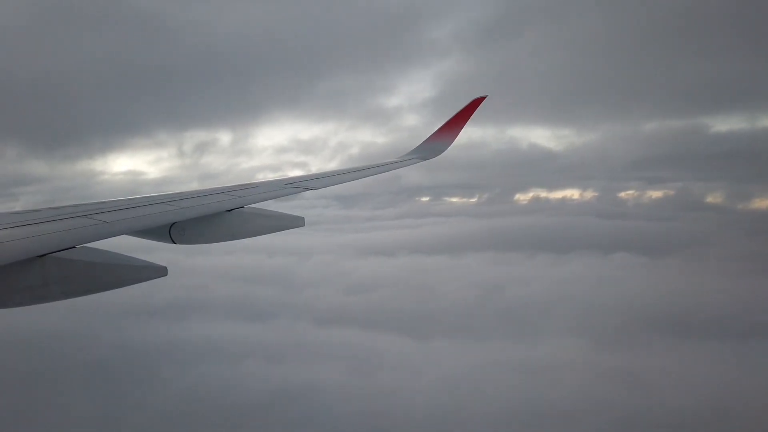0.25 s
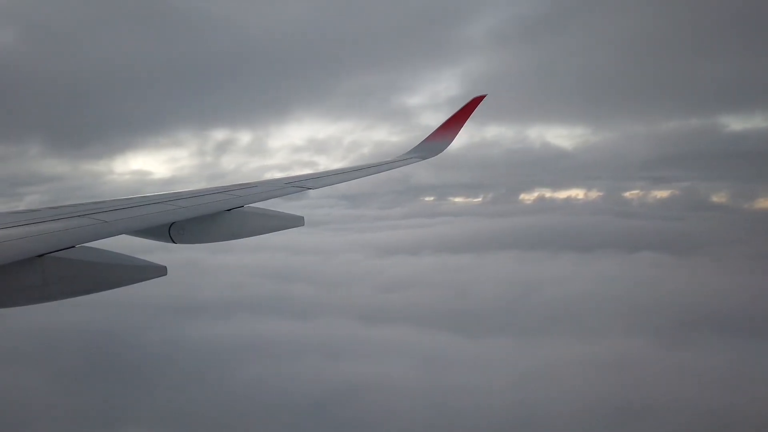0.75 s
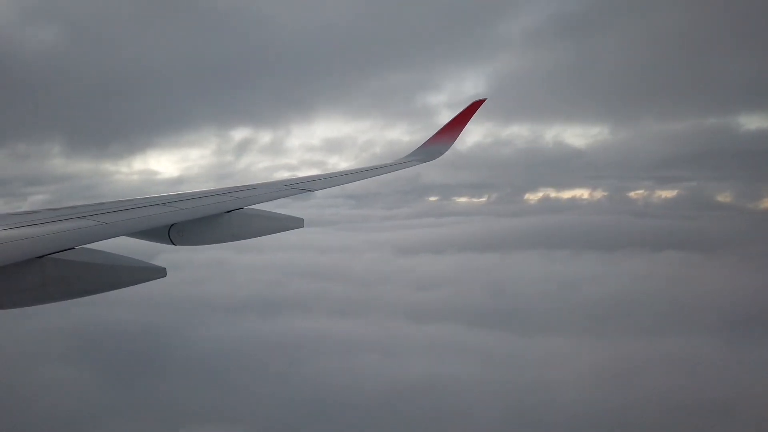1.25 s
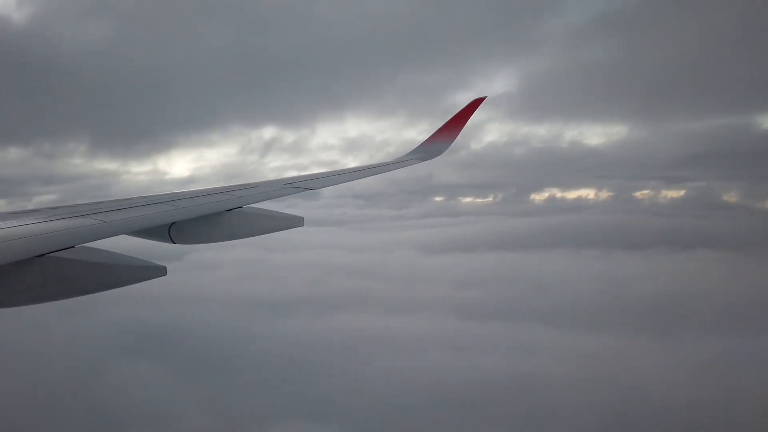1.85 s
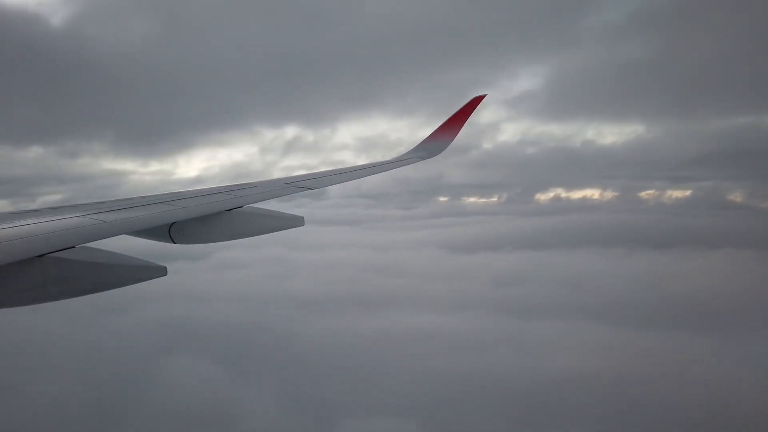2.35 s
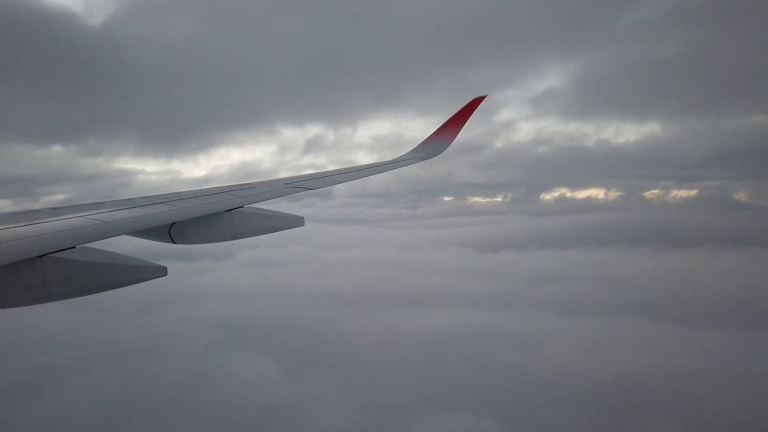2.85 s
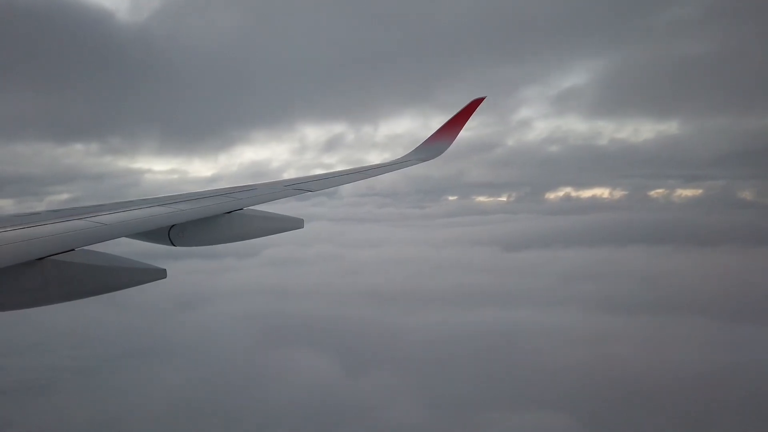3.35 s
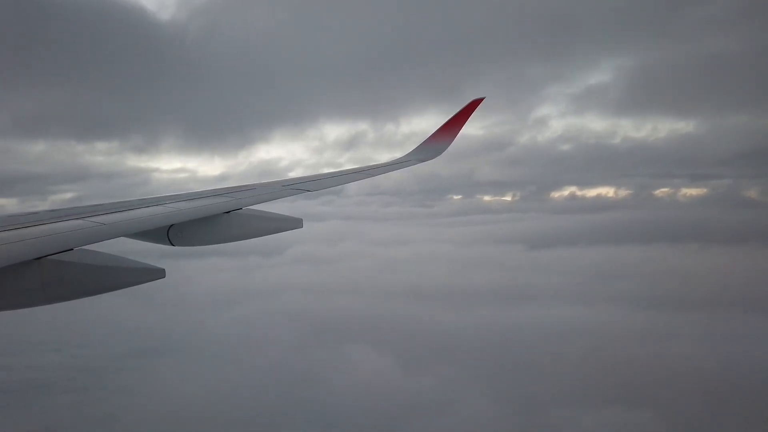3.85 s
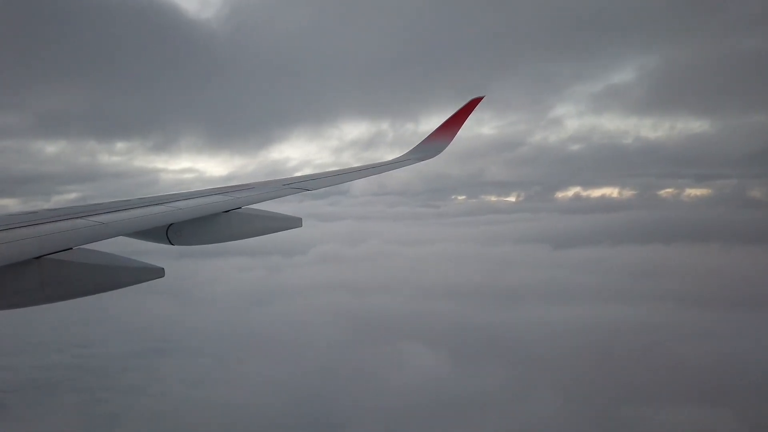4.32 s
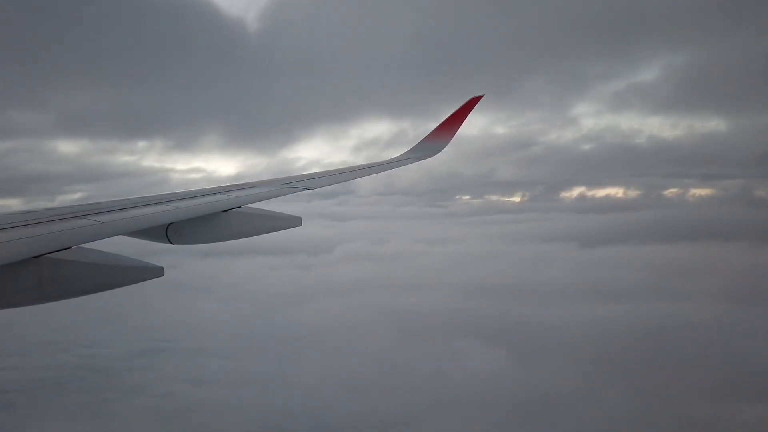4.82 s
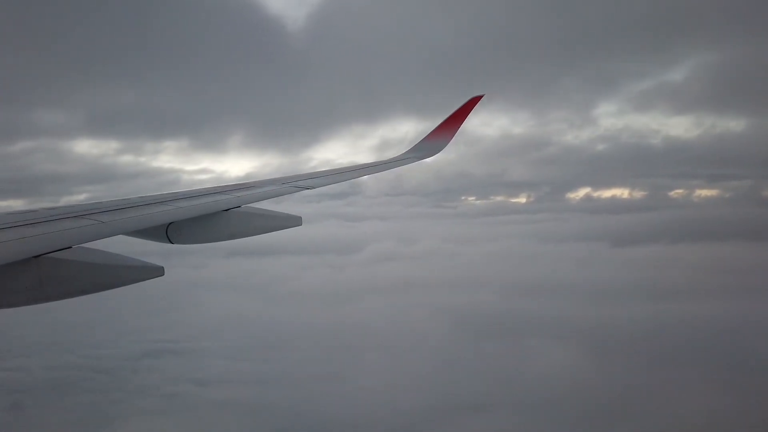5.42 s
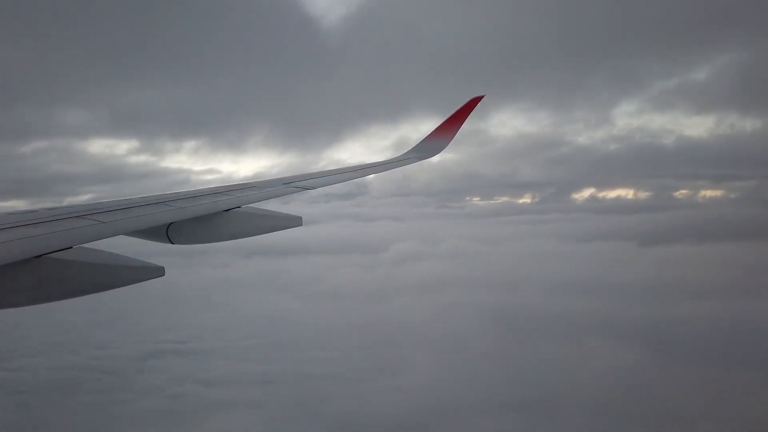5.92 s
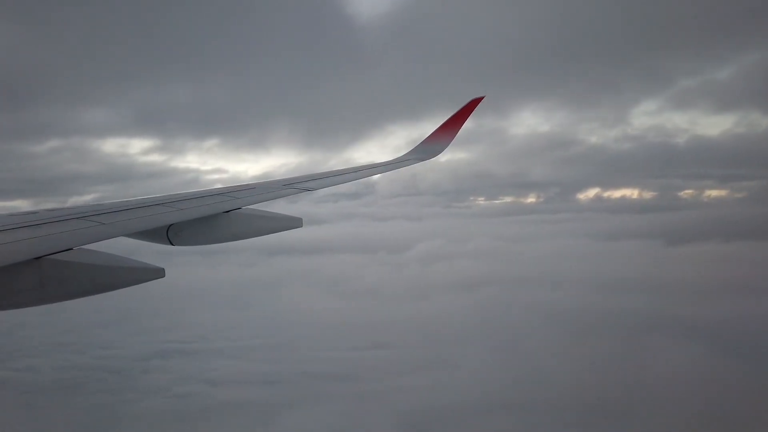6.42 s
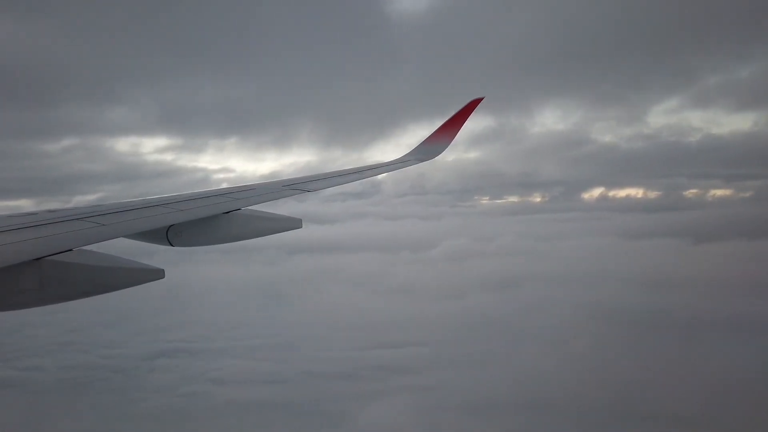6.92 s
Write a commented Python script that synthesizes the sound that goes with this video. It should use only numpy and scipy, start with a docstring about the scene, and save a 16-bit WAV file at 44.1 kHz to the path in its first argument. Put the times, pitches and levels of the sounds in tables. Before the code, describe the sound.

Deep, steady airliner cabin rumble with uneven low booming surges and muffled rushing air, plus one small hard click near the start.

```python
"""A deep rumble fills an airliner in flight at a window seat: shaped noise for shudder, roar and slipstream.
Three low cabin resonances drone as narrow noise and boom as wandering sines in uneven surges.
Noise hisses from the vents; grainy noise makes the trim rustle, tick and chirp very faintly, and a panel ring.
Once, something small and hard nearby scrapes, clicks and rattles: noise bursts with decaying sines."""
import sys
import numpy as np
from scipy.fft import rfft, irfft, next_fast_len
from scipy.io import wavfile
from scipy.ndimage import map_coordinates

SR = 44100
rng = np.random.default_rng(int(sys.argv[2]) if len(sys.argv) > 2 else 0)


def unload_audio(sound):
    """Save the sound as a 16-bit wav file, at the path given as the first command line argument."""
    columns = np.transpose(np.atleast_2d(sound))
    # keep every value between -1 and 1, then stretch to whole-number steps
    steps = np.round(np.clip(columns, -1, 1) * 32767)
    wavfile.write(sys.argv[1], SR, steps.astype(np.int16))


N = 316197


def amp(db):
    """Decibels to gain."""
    return 10 ** (np.asarray(db) / 20)


def unit(x):
    """Scale to rms 1."""
    return x / np.sqrt(np.mean(x ** 2) + 1e-20)


def along(points, hz):
    """Read (frequency, value) points on a log frequency axis."""
    f, v = np.transpose(points)
    return np.interp(np.log(hz + 1), np.log(f), v)


def clock():
    """The time of every sample in seconds."""
    return np.arange(N) / SR


def curves(rows):
    """One value per sample for each column after the time."""
    s, *cols = np.transpose(rows)
    return [np.interp(clock(), s, c) for c in cols]


def wobble(rate):
    """A smooth random curve, rate knots a second."""
    knots = rng.standard_normal(int(N * rate / SR) + 4)
    return map_coordinates(knots, [np.arange(N) * rate / SR])


def filtered(x, response):
    """x times a response of frequency, padded so that its end does not wrap onto its start."""
    m = next_fast_len(N + SR // 2)
    return irfft(rfft(x, m) * response(np.fft.rfftfreq(m, 1 / SR)), m)[..., :N]


def swell(s, half):
    """A bell-shaped envelope around time s."""
    return np.exp(-.5 * np.minimum(((clock() - s) / half) ** 2, 100))


def fading(s, t60, attack_s=.0003):
    """An envelope that rises quickly at time s and dies by 60 dB in t60."""
    age = np.maximum(clock() - s, 0)
    rise = 1 - np.exp(-age / attack_s)
    return rise * amp(-60 * np.minimum(age / t60, 4))


def resonance(hz, centre, width):
    """A bell over frequency, 1 at its centre and half at the edges of its width."""
    return 1 / (1 + (2 * (hz - centre) / width) ** 2)


def humps(resonances, hz):
    """The dB that (frequency, width, dB) resonances add to a spectrum."""
    return sum(db * resonance(hz, centre, width) for centre, width, db in resonances)


def bands(resonances, hz):
    """The spectrum in dB of (frequency, width, dB) resonances alone, with dark valleys."""
    return 20 * np.log10(sum(amp(db) * resonance(hz, centre, width) for centre, width, db in resonances))


# how alike the two channels hear the cabin: (frequency [Hz], coherence [0 to 1])
STEREO_COHERENCE = [(30, .99998), (60, .99993), (100, .9989), (160, .9989), (230, .9955), (320, .995),
                    (420, .967), (520, .955), (1050, .935), (1250, .79), (1500, .82), (1850, .73),
                    (2200, .33), (2800, .56), (3600, .25), (4200, .35), (7000, .08)]
# sound from the window side reaches the left channel first: (frequency [Hz], lead [rad])
LEFT_LEAD = [(1700, 0), (1950, .4), (2250, 2.0), (2800, .9), (3200, 1.6), (3600, 1.7), (3900, 3.2),
             (6000, 3.4), (8500, 1.5)]


def noise(colour, ripple_db=0, ripple_hz=35):
    """Stereo noise of rms 1 with colour(Hz) in dB; long waves reach both channels alike."""
    knots = rng.standard_normal(4096)

    def ripple(hz):
        """Cabin reflections leave fine, steady peaks and dips, most of all in the treble."""
        return ripple_db * hz / (hz + 500) * map_coordinates(knots, [hz / ripple_hz], mode="mirror")

    def mid_side_shape(hz):
        """Share the spectrum between mid and side to reach the coherence."""
        turn = np.arccos(np.clip(along(STEREO_COHERENCE, hz), -1, 1)) / 2
        return amp(colour(hz) + ripple(hz)) * [np.cos(turn), np.sin(turn)]

    def lead(hz):
        """Advance the left phase and delay the right, half the lead each."""
        return np.exp(.5j * np.outer([1, -1], along(LEFT_LEAD, hz)))

    mid, side = filtered(rng.standard_normal((2, N)), mid_side_shape)
    return unit(filtered(np.array([mid + side, mid - side]), lead))


# deep shudder of the airframe: (frequency [Hz], relative level [dB per Hz])
SHUDDER_SPECTRUM = [(10, -33), (22, -11.5), (36, 0), (50, -3), (68, -3.5), (80, -2.5), (95, -13),
                    (200, -48.5), (600, -120)]
# hull roar: (frequency [Hz], relative level [dB per Hz])
ROAR_SPECTRUM = [(20, -52), (62, -10.5), (84, 2.5), (101, 1), (135, 4.5), (160, 2), (190, 0.5), (218, -2),
                 (250, -3.5), (300, -7.5), (365, -14.5), (400, -20.5), (700, -67.5), (2000, -120)]
# hull roar, rising and easing with the air: (time [s], level [dB])
ROAR_LEVELS = [(0.5, -26.5), (1.1, -25.5), (1.4, -27), (1.97, -25), (2.3, -27), (2.95, -26), (3.7, -26),
               (4.5, -26), (5.1, -26), (5.95, -27.5), (6.45, -26), (7.1, -26)]
# slipstream heard through the wall: (frequency [Hz], relative level [dB per Hz])
RUSH_SPECTRUM = [(150, -12.5), (350, 6), (560, -0.5), (700, -2.5), (850, -7.5), (1100, -11.5),
                 (1350, -16.5), (1750, -18.5), (2080, -22.5), (2320, -26), (3100, -30), (4500, -39.5),
                 (7000, -54), (16000, -89)]
# wall panels that ring in the flow: (frequency [Hz], width [Hz], boost [dB])
WALL_PANELS = [(433, 17, 2), (495.5, 22, 4), (717, 55, 4), (1077, 49, 4), (2070, 61, 1), (2760, 240, 2),
               (3900, 150, 1.5)]
SHUDDER_DB, RUSH_DB = -33, -44.5  # mid levels, each wavering slightly


def airframe():
    """The airframe shudders, the hull roars, and the slipstream is coloured by the wall panels."""
    roar_db, = curves(ROAR_LEVELS)
    shudder = amp(SHUDDER_DB + 0.46 * wobble(6.1)) * noise(lambda hz: along(SHUDDER_SPECTRUM, hz))
    roar = amp(roar_db) * noise(lambda hz: along(ROAR_SPECTRUM, hz))
    rush_noise = noise(lambda hz: along(RUSH_SPECTRUM, hz) + humps(WALL_PANELS, hz),
                       ripple_db=1.56, ripple_hz=16)
    rush = amp(RUSH_DB + .3 * wobble(8.8)) * rush_noise
    return shudder + roar + rush


# uneven surges of the low drone:
# (time [s], half length [s], lower resonance level [dB], middle level [dB], upper level [dB])
SURGES = [(0.136, 0.028, -37, -17.5, -41.5), (0.178, 0.025, -18.5, -31.5, -29),
          (0.922, 0.021, -21, -26, -28), (1.183, .022, -28, -26, -25.5), (1.506, 0.032, -20, -22.5, -27),
          (1.972, 0.012, -41, -37, -20), (2.048, 0.021, -17.5, -24.5, -34),
          (2.098, 0.03, -42.5, -37, -29.5), (2.449, 0.029, -30, -18.5, -43), (2.515, 0.06, -23, -41.5, -40),
          (2.947, 0.048, -24.5, -19, -27), (3.089, 0.075, -46, -24.5, -33),
          (3.362, 0.074, -31, -22.5, -39.5), (3.842, 0.048, -16.5, -28, -35.5),
          (4.595, 0.046, -20, -26, -47), (4.702, 0.025, -20, -27, -37.5), (5.2, 0.057, -23, -44, -44),
          (5.367, 0.037, -24, -23.5, -41.5), (5.712, 0.07, -25.5, -25.5, -40), (6.448, .02, -38, -34, -31),
          (6.852, 0.017, -31.5, -18.5, -28), (7.099, 0.019, -17.5, -45, -28.5)]


def surge(index):
    """The level of one resonance's surges: each surge swells and fades, and their powers add."""
    return np.sqrt(sum((amp(levels[index]) * swell(s, half)) ** 2 for s, half, *levels in SURGES))


# cabin resonances: (frequency [Hz], width [Hz], drone level between surges [dB], surge pitch wander [Hz])
CABIN_RESONANCES = [(101.3, 23, -30, 4), (153.1, 18, -32, 4), (222, 36, -39.5, 12)]
SURGE_FLUTTER_DB = -1.07  # unsteadiness within a surge


def booms():
    """The airflow keeps three cabin resonances droning; each surge turns the drone into a nearly pure tone."""
    out = np.zeros((2, N))
    for k, (centre, width, drone_db, wander_hz) in enumerate(CABIN_RESONANCES):
        drone = noise(lambda hz: 20 * np.log10(resonance(hz, centre, width)))
        pitch_hz = centre + wander_hz * wobble(26)
        tone = np.sqrt(2) * np.sin(2 * np.pi * np.cumsum(pitch_hz) / SR)
        swelling, steady = surge(k), amp(drone_db)
        free_share = steady / np.hypot(steady, swelling)  # of the drone, left by a surge
        flutter = amp(SURGE_FLUTTER_DB * wobble(27))
        out += steady * free_share * drone + swelling * flutter * tone
    return out


# air vents: (frequency [Hz], relative level [dB per Hz])
VENT_SPECTRUM = [(2000, -17), (5500, 0), (6800, -5), (7800, 2.5), (9200, -1.5), (10400, 3.5), (12000, -3),
                 (13000, -9), (14000, -19.5), (16000, -33.5)]


def vents():
    """Air from the vents makes a faint, slightly unsteady hiss."""
    level = amp(-82.0 + 1.4 * wobble(6.3))
    return level * noise(lambda hz: along(VENT_SPECTRUM, hz), ripple_db=0.5)


# soft rustles of the trim: (time [s], level [dB], half length [s], crisp crackle level [dB])
TRIM_RUSTLES = [(0.134, -57, 0.014, -71.5), (0.188, -70.5, 0.02, -84), (0.331, -63, .01, -91),
                (0.738, -79, 0.02, -80.5), (0.928, -65, 0.013, -74), (1.01, -64, 0.046, -74.5),
                (1.17, -74, .02, -80), (1.526, -73.5, 0.013, -77), (2.053, -60, 0.02, -82),
                (2.112, -60.5, 0.016, -92.5), (2.41, -74, 0.0058, -74), (2.912, -63, 0.017, -89.5),
                (2.947, -70, .01, -75), (3.0, -69.5, 0.024, -73), (3.173, -69, 0.011, -90),
                (3.406, -62.5, 0.017, -71.5), (3.983, -65, 0.0088, -80), (4.588, -68, .012, -73.5),
                (4.654, -63, 0.01, -85), (4.705, -71, 0.0066, -76), (4.887, -66, 0.03, -89),
                (4.992, -64, .025, -80.5), (5.361, -61.5, 0.0059, -90), (5.78, -72, .007, -79),
                (6.9, -69.5, 0.06, -85.5)]
# body of the rustles and ticks: (frequency [Hz], relative level [dB per Hz])
RUSTLE_SPECTRUM = [(600, -15.5), (1200, -1), (1900, 2.5), (2450, -7.5), (3200, -8.5), (4200, -18.5),
                   (5600, -23.5), (7500, -30.5), (11000, -31.5), (15000, -52)]
# what the trim rings with: (frequency [Hz], width [Hz], boost [dB])
TRIM_RESONANCES = [(1700, 130, 6), (2100, 100, 6), (3200, 220, 7), (4010, 200, 6), (4870, 250, 2)]
# crackle of the rustles: (frequency [Hz], relative level [dB per Hz])
CRACKLE_SPECTRUM = [(2800, -36), (3600, -9.5), (4000, 1.5), (4400, -2.5), (4900, -5), (5600, -9),
                    (6300, -12.5), (7200, -20), (10000, -40.5)]
# light ticks of the trim: (time [s], level [dB])
TRIM_TICKS = [(.205, -62.5), (.5251, -55), (.5385, -57), (1.394, -54), (3.1557, -55), (3.3992, -60)]
TICK_T60_S = 0.08
# thin high chirps: (time [s], level [dB], half length [s], frequency [Hz])
TRIM_CHIRPS = [(0.46, -56, .0035, 10700), (0.836, -74, .02, 10280), (.94, -74, 0.02, 10200),
               (2.941, -72, .02, 9950), (3.054, -73.5, 0.011, 10530), (3.41, -77.5, 0.016, 10350),
               (3.815, -80, 0.018, 9260), (5.132, -66, 0.012, 10800), (5.179, -71.5, .024, 10200),
               (5.745, -72, .012, 10370), (5.944, -76, .025, 11000), (6.28, -74.5, 0.029, 10260),
               (7.043, -72, 0.0059, 10600)]


def trim(chirp_width_hz=350, scratch_width_hz=1800, scratch_db=-4, grain_db=2.5, restless_db=-71):
    """The shaking trim rubs in grainy rustles over a restless bed, ticks, and chirps with a fine scratch."""
    grain = unit(amp(grain_db * wobble(270)))

    bed = amp(restless_db + 4.0 * wobble(35))
    rubbing = bed + sum(amp(db) * swell(s, half) for s, db, half, _ in TRIM_RUSTLES)
    ticking = sum(amp(db) * fading(s, TICK_T60_S) for s, db in TRIM_TICKS)
    body = noise(lambda hz: along(RUSTLE_SPECTRUM, hz) + humps(TRIM_RESONANCES, hz), ripple_db=2.5)
    rustles = np.hypot(rubbing * grain, ticking) * body

    crackling = sum(amp(db) * swell(s, half) for s, _, half, db in TRIM_RUSTLES)
    crackle = crackling * grain * noise(lambda hz: along(CRACKLE_SPECTRUM, hz), ripple_db=2.5)

    def slow_noise(width):
        """Low noise that spreads each chirp into a band."""
        return unit(filtered(rng.standard_normal((2, N)), lambda hz: np.exp(-.5 * (hz / width) ** 2)))

    scratch = amp(scratch_db) * grain * slow_noise(scratch_width_hz)
    scrape = unit(slow_noise(chirp_width_hz) + scratch)
    chirps = sum(amp(db) * swell(s, half) * np.sin(2 * np.pi * hz * clock())
                 for s, db, half, hz in TRIM_CHIRPS)
    return rustles + crackle + scrape * chirps


# modes of the loose panel: (frequency [Hz], width [Hz], level [dB])
PANEL_MODES = [(2050, 60, 3), (3120, 150, 0)]
PANEL_S, PANEL_DB, PANEL_T60_S = 0.11, -65.5, 0.6  # start, level and decay


def panel():
    """A loose panel starts ringing with the first rustle: noise in two narrow bands that dies away."""
    return amp(PANEL_DB) * fading(PANEL_S, PANEL_T60_S) * noise(lambda hz: bands(PANEL_MODES, hz))


# the struck part scrapes just before it snaps: (time [s], level [dB], half length [s])
SNAP_SCRAPE = (.4645, -58, .0025)
# what scrape and rattle resonate with: (frequency [Hz], width [Hz], level [dB])
RATTLE_RESONANCES = [(2720, 160, 0.5), (3020, 220, -0.5), (3850, 150, -4), (4450, 200, -7),
                     (5430, 300, -13), (6000, 300, -15)]
RATTLE_S, RATTLE_DB, RATTLE_T60_S = .483, -58.5, 0.32  # start, level and decay


def rattle(grain_db=4.0):
    """The clicking part scrapes into its snap, then chatters in fine, uneven grains."""
    s, db, half = SNAP_SCRAPE
    level = amp(db) * swell(s, half) + amp(RATTLE_DB) * fading(RATTLE_S, RATTLE_T60_S)
    grain = unit(amp(grain_db * wobble(450)))
    return level * grain * noise(lambda hz: bands(RATTLE_RESONANCES, hz))


# contacts of the nearby click: (time [s], level [dB])
CLICK_CONTACTS = [(0.4681, -39.5), (0.474, -41.5), (0.485, -50.5)]
# crack of each contact: (frequency [Hz], relative level [dB per Hz])
CRACK_SPECTRUM = [(500, -16), (1400, -1), (2300, -6), (2850, 7), (3450, -2.5), (3850, 5.5), (4150, -9.5),
                  (4450, -1), (4900, -6), (6000, -6), (8000, -2), (9000, -3.5), (9800, -4.5), (10900, 5),
                  (11700, 0.5), (12600, -7.5), (14000, -10.5), (16000, -12)]
# what the struck part rings with: (frequency [Hz], relative level [dB], t60 [s])
STRUCK_MODES = [(1150, -9, .08), (1550, -8.5, .07), (2040, -18, 0.11), (2350, -9, 0.095),
                (2710, -11, 0.055), (2920, -11.5, 0.099), (3810, -13, 0.07), (4560, -20, .065),
                (7970, -22, .07), (10750, -12, .055), (11400, -13, .05)]


def click(t60=0.055, tail_t60=0.24, tail_db=-22, ring_db=-3.0, scatter_db=0.5):
    """Hard contacts in quick succession: each cracks, rings the struck part and leaves a short cabin tail."""
    power = 0
    for s, db in CLICK_CONTACTS:
        tail = amp(tail_db) * fading(s, tail_t60)
        power = power + amp(db) ** 2 * (fading(s, t60) ** 2 + tail ** 2)
    out = np.sqrt(power) * noise(lambda hz: along(CRACK_SPECTRUM, hz), ripple_db=2.6, ripple_hz=69.8)

    t = np.arange(SR // 4) / SR
    for s, db in CLICK_CONTACTS:
        for hz, level_db, ring_t60 in STRUCK_MODES:
            stereo_lead = np.array([[.5], [-.5]]) * along(LEFT_LEAD, hz)
            phase = 2 * np.pi * (hz * t + rng.random()) + stereo_lead
            start_db = db + ring_db + level_db + scatter_db * rng.standard_normal()
            ring = amp(start_db - 60 * t / ring_t60) * np.sin(phase)
            out[:, round(s * SR):][:, :len(t)] += ring
    return out


def scene():
    """The cabin's roar with the small sounds near the seat."""
    return airframe() + booms() + vents() + trim() + panel() + rattle() + click()


TOP_HZ = 15800


def record(dry):
    """A steep low-pass leaves almost nothing above the band limit."""
    return filtered(dry, lambda hz: 1 / (1 + (hz / TOP_HZ) ** 80))


dry = scene()
out = record(dry)
unload_audio(out)
```